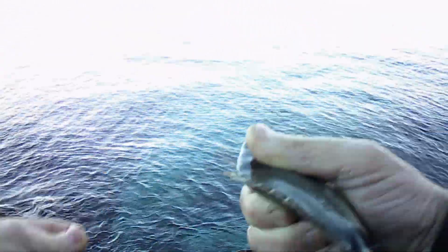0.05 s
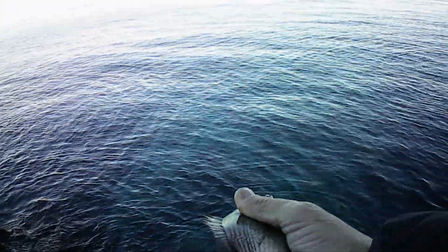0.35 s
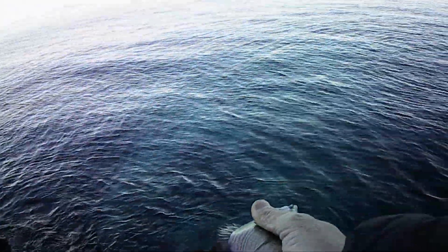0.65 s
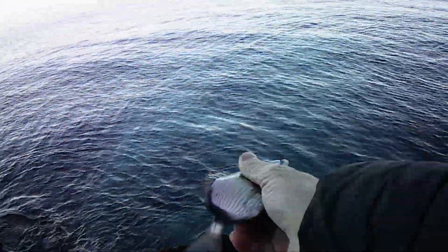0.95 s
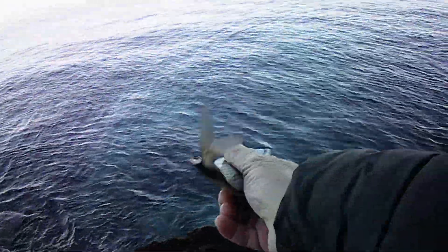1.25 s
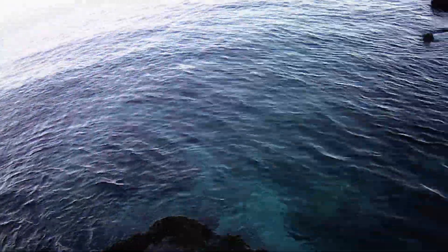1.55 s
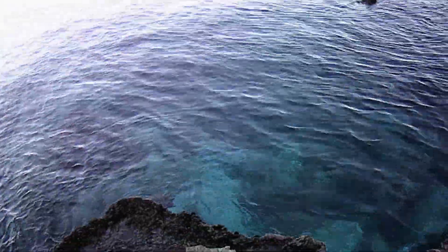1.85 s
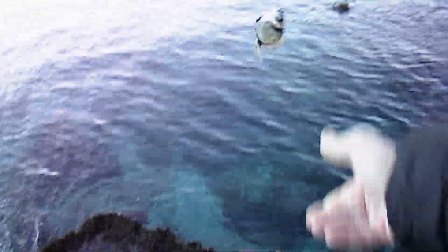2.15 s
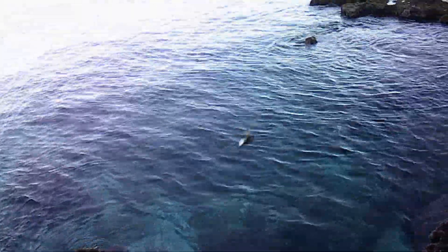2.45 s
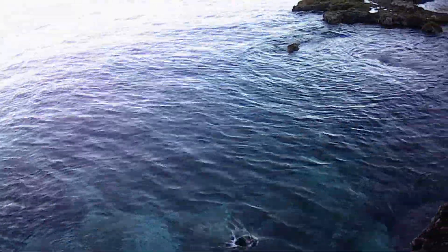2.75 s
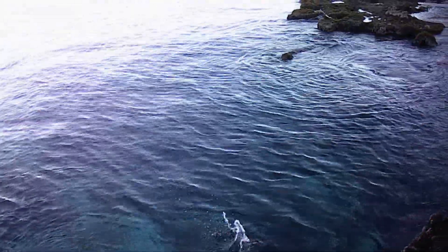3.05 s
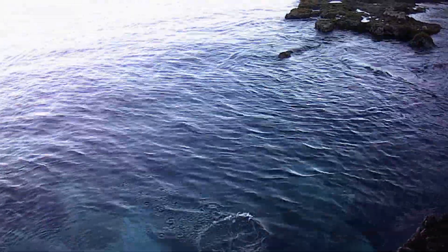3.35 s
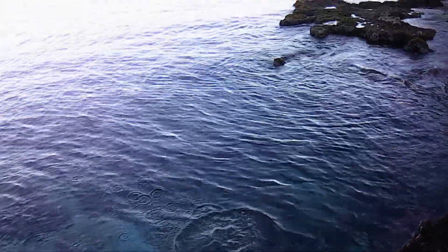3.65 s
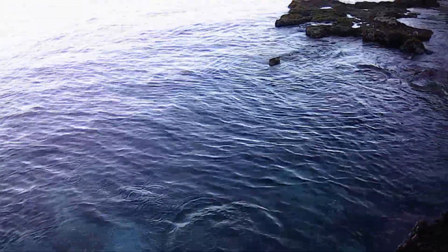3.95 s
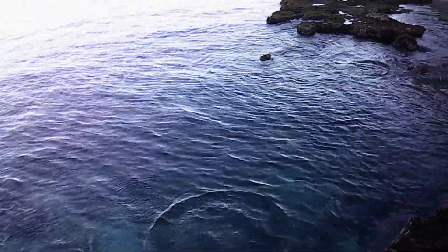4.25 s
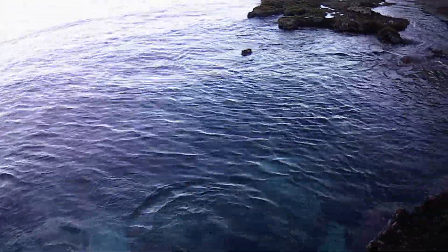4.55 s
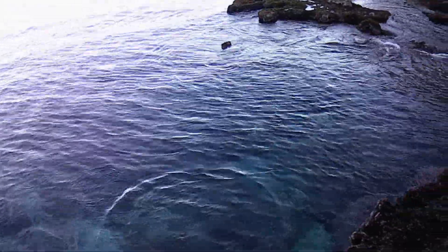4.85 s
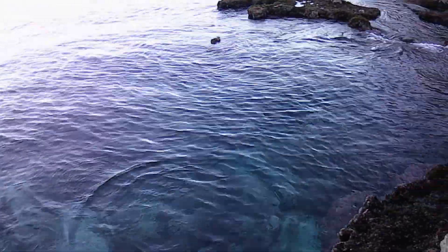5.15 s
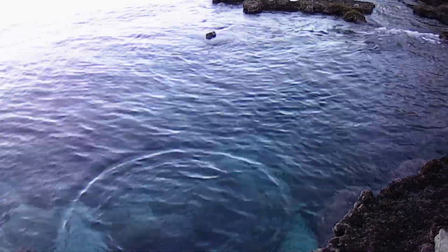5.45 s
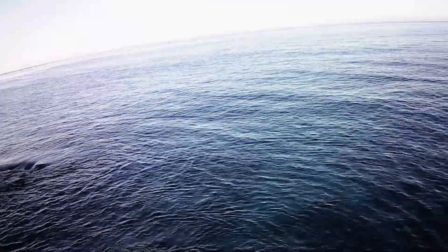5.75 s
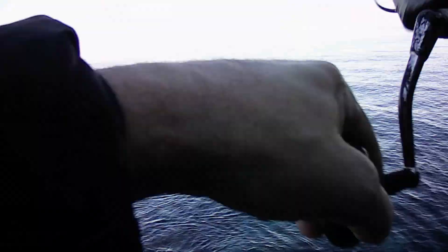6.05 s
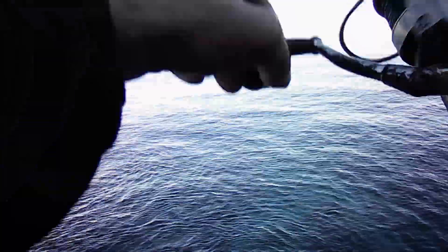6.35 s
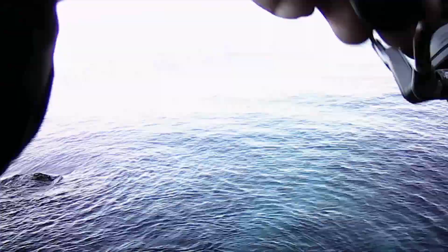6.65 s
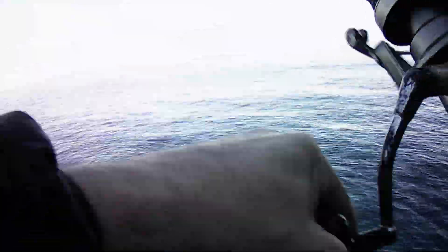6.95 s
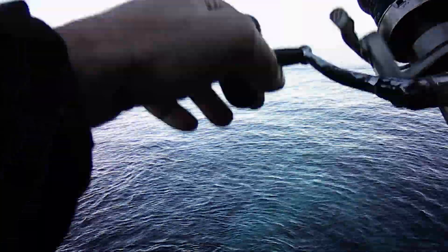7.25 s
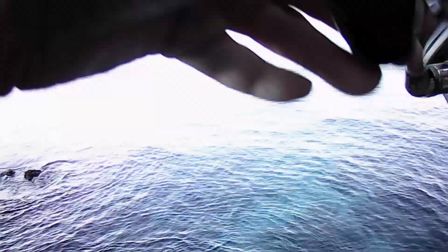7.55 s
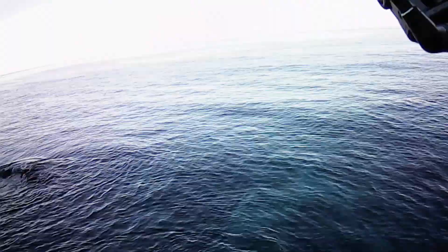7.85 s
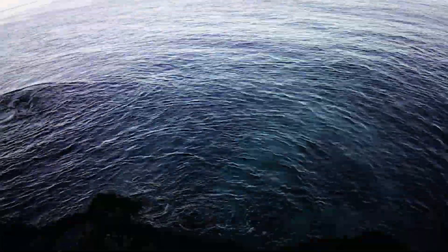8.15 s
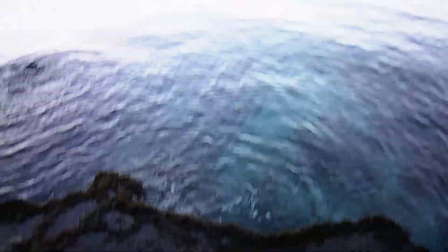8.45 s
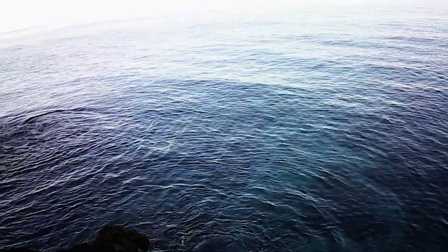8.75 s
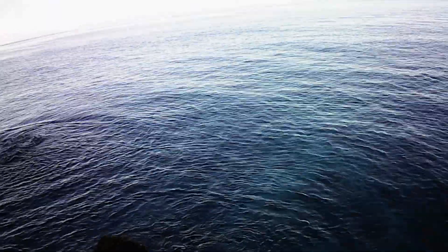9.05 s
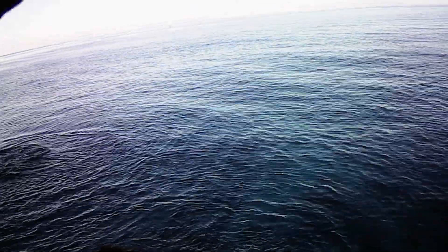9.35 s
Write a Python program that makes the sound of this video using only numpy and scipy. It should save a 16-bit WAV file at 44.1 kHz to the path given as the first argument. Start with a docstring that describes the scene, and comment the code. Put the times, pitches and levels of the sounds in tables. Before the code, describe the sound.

Calm sea water laps softly against rocks, full of little bubbles, plops and gurgles. A jacket sleeve rustles faintly and a fish lands in the water with a small splash. Fishing gear clicks sharply close to the microphone, and the sound drops out for an instant. The wash returns a little fuller over a faint, distant boat engine hum. A hand then knocks loudly on the microphone housing, followed by ticks and sleeve rustle.

```python
"""A rocky shore by a calm sea. Water laps in a soft wash full of ringing air bubbles, with single plops,
gurgles and the small splash of a fish thrown back. Gear clicks and thumps close by and the sound drops
out for a moment; then a far boat engine hums under the wash. A hand knocks and squeaks on the
microphone's housing, a loose fitting ticks, and a jacket sleeve rustles as cloth slips over cloth."""
import sys
import numpy as np
from scipy import signal
from scipy.fft import rfft, irfft
from scipy.io import wavfile

SR = 44100
rng = np.random.default_rng(int(sys.argv[2]) if len(sys.argv) > 2 else 0)


def store_pcm(level_fs):
    """Save levels as 16-bit WAV."""
    pcm = np.round(np.clip(level_fs, -1, 1) * 32767).astype(np.int16)
    wavfile.write(sys.argv[1], SR, np.atleast_2d(pcm).T)


N = 418950
TIME = np.arange(N) / SR


def from_db(db):
    """Decibels to gain."""
    return 10 ** (np.asarray(db) / 20)


def rms_one(x):
    """Scale to rms 1."""
    return x / np.sqrt(np.mean(x ** 2) + 1e-20)


def automation(points):
    """Straight ramps between (time, value) breakpoints."""
    return np.interp(TIME, *np.transpose(points))


def add(out, s, sound):
    """Mix a sound in at s seconds."""
    i = int(s * SR)
    out[i:i + len(sound)] += sound[:max(N - i, 0)]


def drift(rate_hz):
    """A smooth random modulator, rms about 1."""
    pole = np.exp(-80 * np.pi * rate_hz / SR)
    steps = rng.standard_normal(N // 40 + 2002)   # one every 40 samples
    slow = signal.lfilter([1], [1, -2 * pole, pole * pole], steps)[2000:]
    return np.interp(np.arange(N) / 40, np.arange(len(slow)), rms_one(slow))


def colour(x, eq):
    """Apply an EQ curve that rolls off 30 dB an octave past its ends; rms 1."""
    hz, db = np.transpose(eq)
    octave = np.log2(np.maximum(np.arange(N // 2 + 1) * SR / N, 1))
    outside = np.abs(octave - np.clip(octave, np.log2(hz[0]), np.log2(hz[-1])))
    gain = from_db(np.interp(octave, np.log2(hz), db) - 30 * outside)
    return rms_one(irfft(rfft(x) * gain, N))


def patchy_noise(patchy_db, rate_hz):
    """Flat noise whose half-octave bands swell and sink on their own."""
    edges = np.geomspace(60, 15000, 17)
    out, white = 0, rng.standard_normal((2, N))
    for k, band_hz in enumerate(zip(edges, edges[1:])):
        band = signal.sosfilt(signal.butter(2, band_hz, "band", fs=SR, output="sos"), white[k % 2])
        out = out + band * from_db(patchy_db * drift(rate_hz))
    return rms_one(out)


def grains(per_s, spread_db):
    """A crackle of tiny impacts of random strength; rms 1."""
    sizes = from_db(spread_db * np.minimum(rng.exponential(1, N), 5)) * rng.choice([-1, 1], N)
    return rms_one(sizes * (rng.random(N) < per_s / SR))


def surges(rows):
    """One envelope per level column: each surge builds smoothly to its crest and dies away."""
    power = 0
    for s, attack_s, release_s, *db in rows:
        age = np.maximum(TIME - s, 0) / release_s
        fade = (np.minimum(TIME - s, 0) / attack_s) ** 2 + age ** 2 / (.5 + age)
        power = power + from_db(db)[:, None] ** 2 * np.exp(-np.minimum(fade, 40))
    return np.sqrt(power)


def waves(rows):
    """Wave envelopes: water builds faster than it drains."""
    return surges([(s, 0.67 * drain_s, drain_s, *db) for s, drain_s, *db in rows])


def bubble(hz, t60, rise_oct_per_s, onset_cycles):
    """A pocket of air rings and climbs in pitch as it nears the surface; envelope peak 1."""
    t = np.arange(int(t60 * SR) + 2) / SR
    envelope = (1 - np.exp(-t * hz / onset_cycles)) * from_db(-60 * t / t60)
    phase = 2 * np.pi * np.cumsum(hz * 2 ** (rise_oct_per_s * t)) / SR
    return envelope / envelope.max() * np.sin(phase)


def bubbling(low_hz, high_hz, spread_db, cycles, max_oct_per_s, count):
    """A bed of small bubbles, with about equal energy per Hz; rms 1."""
    out = np.zeros(N)
    for when, pitch, strength, life, climb in rng.random((count, 5)):
        hz = low_hz * (high_hz / low_hz) ** pitch
        gain = from_db(-spread_db * np.log(strength + .02)) * hz
        ring = bubble(hz, cycles * (.5 + life) / hz, max_oct_per_s * climb, onset_cycles=0.57)
        add(out, when * N / SR, gain * ring)
    return rms_one(out)


# EQ of the mid slosh, the bright spray and the low swash: (f/Hz, level/dB)
SLOSH_EQ = [(90, -20), (130, -13), (180, -6), (300, -0.5), (450, -1.5), (700, -3), (900, -3), (1100, -4.5),
            (1350, -6.5), (1600, -6.5), (1850, -14), (2100, -24), (2400, -41.5)]
SPRAY_EQ = [(1700, 5.5), (2100, 0.5), (2450, 1), (2850, 1), (3250, -4.5), (3750, -1), (4300, -9.5),
            (4950, -6), (6000, -11.5), (7000, -16.5), (8500, -24), (10500, -22), (12500, -27)]
SWASH_EQ = [(20, -14), (45, -9), (80, -1.5), (140, 0.5), (220, -3)]
# vigour of the wash, one list before the dropout and one after: (t/s, level/dB)
WASH_RIDE = [
    [(0.0, -56), (1.29, -61.5), (1.78, -56), (2.14, -55.5), (2.62, -57.5), (3.07, -54), (3.51, -56.5),
     (4.25, -54.5), (5.15, -49)],
    [(5.8, -49.5), (6.14, -54), (6.58, -50.5), (7.34, -48.5), (7.67, -48.5), (8.0, -47.5), (8.87, -51.5),
     (9.15, -51), (9.5, -52.5)],
]
# low shelf on the slosh, its weight: (t/s, level/dB)
BODY_RIDE = [(0, 1.5), (1.0, 0), (2.3, -1), (2.65, -4), (3.05, 0.5), (3.5, -1), (4.35, -5), (4.75, -5.5),
             (5.15, -2), (5.8, -0.5), (6.9, 1), (7.35, -1.5), (7.7, 0.5), (9.5, .5)]
# bubbles in the wash, strongest while facing the rocks: (t/s, relative level/dB)
BUBBLE_RIDE = [(0, -12), (3, -8.5), (5.2, -11), (5.7, -15)]
# wavelets breaking on the rocks: (crest t/s, drain/s, slosh level/dB, spray level/dB)
WAVELETS = [(0.02, 0.032, -63, -92.5), (0.8, 0.075, -61.5, -75), (1.5, 0.098, -61.5, -68),
            (1.71, 0.038, -57.5, -67), (1.93, 0.13, -58.5, -71), (2.27, 0.12, -53.5, -75),
            (3.14, 0.054, -57.5, -73), (4.36, 0.064, -58, -71), (4.78, 0.038, -61, -84),
            (6.05, 0.27, -47.5, -66), (7.09, 0.11, -48.5, -66), (7.25, 0.031, -44.5, -66),
            (7.42, 0.093, -45, -69), (9.25, 0.37, -71, -68.5)]
# swells heaving in the hollows: (crest t/s, drain/s, level/dB)
HEAVES = [(3.08, 0.13, -65), (3.5, 0.3, -65.5), (4.3, 0.18, -75), (4.52, 0.099, -68.5), (5.17, 0.027, -68),
          (5.68, 0.11, -72), (7.44, 0.042, -63), (7.95, 0.13, -63), (8.52, 0.11, -63)]
SPRAY_DB, SWASH_DB, BODY_HZ = -68, -75, 560


def sea():
    """Water sloshes among the rocks; spray follows its vigour, wavelets lift both, swells heave below."""
    wash_db = automation([point for part in WASH_RIDE for point in part])
    wave_slosh, wave_spray = waves(WAVELETS)
    slosh_gain = np.hypot(from_db(wash_db), wave_slosh)
    spray_gain = np.hypot(from_db(SPRAY_DB + 0.79 * (wash_db - wash_db.mean())), wave_spray)
    swash_gain = np.hypot(from_db(SWASH_DB), waves(HEAVES)[0])
    bubble_gain = from_db(automation(BUBBLE_RIDE))
    churn = patchy_noise(patchy_db=1.37, rate_hz=14)
    bubbles = bubbling(201.5, 1973, spread_db=2.0, cycles=30.3, max_oct_per_s=10.4, count=3600)
    fizz = bubbling(1900, 4500, spread_db=2.5, cycles=51, max_oct_per_s=9, count=2000)
    drops = rng.standard_normal(N) + from_db(-5.5) * grains(per_s=1100, spread_db=4.0)
    spray = colour(drops + from_db(-1) * bubble_gain * fizz, SPRAY_EQ)
    slosh = colour(churn + bubble_gain * bubbles, SLOSH_EQ)
    lows = signal.sosfiltfilt(signal.butter(2, BODY_HZ, fs=SR, output="sos"), slosh)
    slosh += (from_db(automation(BODY_RIDE)) - 1) * lows
    ripple = from_db(1.43 * drift(7.9))   # each ripple lifts slosh and spray together
    swash = colour(rng.standard_normal(N), SWASH_EQ)
    return ripple * (slosh_gain * slosh + spray_gain * spray) + swash_gain * swash


# EQ of the noise floor: (f/Hz, level/dB)
HISS_EQ = [(2000, -9), (7000, 3), (8500, -1.5), (10200, 0), (12500, -11.5)]


def hiss():
    """The microphone's own faint, steady hiss."""
    return from_db(-82) * colour(rng.standard_normal(N), HISS_EQ)


# large single bubbles: (t/s, peak level/dB, f/Hz, t60/s)
PLOPS = [(0.028, -46.5, 434, 0.075), (0.06, -46, 486, 0.06), (0.16, -47.5, 713, 0.08),
         (0.239, -48, 1130, 0.035), (0.434, -48.5, 505, 0.041), (0.597, -45, 840, 0.023),
         (0.598, -46, 537, 0.027), (1.572, -38, 342, 0.068), (1.614, -44, 311, 0.11),
         (2.09, -43, 527, 0.12), (2.11, -43, 700, 0.04), (2.799, -39.5, 374, 0.042),
         (2.855, -39, 1076, 0.076), (2.867, -32.5, 1117, 0.035), (2.871, -35, 590, 0.024),
         (2.881, -31.5, 478, 0.032), (2.965, -42, 1555, 0.062), (3.066, -55, 2600, 0.054),
         (3.085, -47, 287, 0.042), (3.109, -39, 434, .036), (3.131, -40.5, 660, .04),
         (3.339, -43, 690, 0.026), (3.606, -42.5, 804, 0.04), (3.663, -36, 335, 0.038),
         (4.518, -31, 950, 0.025), (4.799, -41.5, 1110, 0.042), (4.978, -38.5, 342, 0.12),
         (5.167, -39, 765, 0.037), (5.174, -35.5, 434, 0.031), (7.287, -35, 860, 0.055),
         (7.311, -42, 470, 0.08), (9.118, -38.5, 357, 0.051)]
BEND_OCT = 0.22   # upward bend over one ring


def plops():
    """Trapped air rings as a round, rising note."""
    out = np.zeros(N)
    for s, db, hz, t60 in PLOPS:
        add(out, s, from_db(db) * bubble(hz, t60, BEND_OCT / t60, onset_cycles=0.46))
    return out


# gurgles where a lap folds in air: (t/s, length/s, peak level/dB, lowest f/Hz, highest f/Hz)
GURGLES = [(0.118, 0.049, -50.5, 600, 1550), (0.692, 0.036, -49.5, 397, 806),
           (0.793, 0.025, -48.5, 297, 1160), (1.71, 0.04, -48, 443, 1500), (1.852, 0.035, -45, 534, 1160),
           (1.955, 0.03, -47, 303, 1400), (2.235, 0.044, -46, 325, 1650), (2.295, 0.026, -44, 396, 1650),
           (2.505, 0.013, -42.5, 560, 1350), (2.669, 0.0064, -46, 600, 1400),
           (2.866, 0.013, -40, 1100, 1740), (3.0, 0.021, -44, 910, 1730), (3.23, 0.045, -42.5, 950, 1590),
           (3.342, 0.022, -46, 554, 1100), (3.387, 0.008, -45, 500, 1200), (3.76, 0.02, -45.5, 850, 1550),
           (4.238, 0.0093, -44, 860, 1400), (4.33, 0.049, -42, 714, 1790), (4.712, 0.02, -40, 375, 990),
           (4.76, 0.027, -40.5, 375, 804), (4.85, 0.052, -42.5, 425, 840), (5.095, 0.015, -42, 420, 736),
           (5.99, 0.075, -43.5, 260, 507), (7.07, 0.025, -47.5, 275, 479), (7.335, 0.073, -39.5, 300, 560),
           (7.497, 0.05, -40, 232, 526)]
# fine high crackles: sprinkles of droplets, and the sleeve's crackle at 1.6-1.8 s; same columns
CRACKLES = [(0.315, 0.006, -58, 4200, 5400), (0.647, 0.011, -51.5, 1730, 2280),
            (1.635, 0.046, -54.5, 2180, 5500), (1.745, 0.025, -69, 3200, 6500),
            (1.975, 0.04, -53, 2000, 3480), (2.235, 0.043, -53, 2000, 3300), (3.39, 0.022, -60, 3500, 6500),
            (3.51, 0.028, -59, 4170, 6400), (3.6, 0.05, -64, 3200, 6000), (3.745, 0.016, -57, 1900, 2780),
            (7.09, 0.05, -52, 2190, 3130), (7.22, 0.052, -51.5, 2000, 3550)]


def ping_runs(rows, cycles, per_s, base_count):
    """Quick runs of bubble-like pings in shuffled pitch: low ones gurgle, high ones crackle."""
    out = np.zeros(N)
    for (s, length, db, low_hz, high_hz), chance in zip(rows, rng.random((len(rows), 3, 64))):
        order, late, accent = chance[:, :base_count + int(length * per_s)]
        pitches = np.geomspace(low_hz, high_hz, len(order))[np.argsort(order)]
        run = np.zeros(SR)
        for k, hz in enumerate(pitches):
            ring = bubble(hz, cycles / hz, BEND_OCT * hz / cycles, onset_cycles=0.52)
            add(run, length * (k + late[k]) / len(pitches), (1 + accent[k]) * ring)
        add(out, s, from_db(db) * run / np.abs(run).max())
    return out


# slaps and spatters of water: (t/s, level/dB, t60/s)
SLAPS = [(0.596, -48, 0.028), (2.203, -47, 0.056), (2.591, -52, 0.027), (2.670, -54, .03),
         (2.74, -39.5, .042), (2.749, -46, 0.039), (2.866, -43, 0.042), (2.878, -45.5, 0.092),
         (3.183, -47, 0.038), (3.388, -50, .028), (3.606, -49, 0.036)]
# their EQ: (f/Hz, level/dB)
SLAP_EQ = [(500, -1.5), (1500, 10.5), (2100, -4.5), (2800, -11.0), (3800, -3.5), (5000, -9.5),
           (7000, -15.0), (11000, -27)]


def slaps(attack_s=0.0044):
    """A slap throws a short burst of spray that takes an instant to spread."""
    drops = rng.standard_normal(N) + from_db(-2.0) * grains(per_s=2500, spread_db=-4.0)
    out, spray = np.zeros(N), colour(drops, SLAP_EQ)
    for s, db, t60 in SLAPS:
        t = np.arange(int(t60 * SR)) / SR
        envelope = np.minimum(t / attack_s, 1) * from_db(db - 60 * t / t60)
        add(out, s, envelope * spray[int(s * SR):][:len(t)])
    return out


def strikes(hits, modes, polarity, detune, snap, crack_db, crack_t60, tail_db, tail_t60, order=2):
    """Each contact snaps and rings the modes, with a gritty crack and a short noise tail."""
    out, t = np.zeros(N), np.arange(SR // 5) / SR
    hz, db, t60 = np.transpose(modes)[:, :, None]
    signs = polarity ** np.arange(len(hz))[:, None]   # 1: hard edge; -1: hollow build-up
    crack_top = signal.butter(3, 7000, fs=SR, output="sos")
    for s, peak_db, low_hz, high_hz in hits:
        strength = signs * from_db(db + rng.standard_normal(hz.shape))
        pitch = hz * (1 + detune * (2 * rng.random(hz.shape) - 1))   # the grip shifts the modes
        ring = np.sum(strength * from_db(-60 * t / t60) * np.sin(2 * np.pi * pitch * t), axis=0)
        decay = from_db(crack_db - 60 * t / crack_t60) + from_db(tail_db - 60 * t / tail_t60)
        grit = decay * rng.standard_normal(len(t))
        crack = signal.sosfilt(crack_top, grit + polarity * snap * (t == 0))
        # light contacts are thinner, soft ones duller
        low_cut = signal.butter(2, low_hz, "high", fs=SR, output="sos")
        high_cut = signal.butter(order, high_hz, fs=SR, output="sos")
        hit = signal.sosfilt(np.vstack([low_cut, high_cut]), ring + crack)
        add(out, s, from_db(peak_db) * hit / np.abs(hit).max())
    return out


# ticks of a loose fitting: (t/s, peak level/dB, low cut f/Hz, high cut f/Hz)
TICKS = [(1.0770, -46.5, 1100, 2400), (7.8566, -20.5, 2000, 5000), (7.8608, -23.5, 4200, 7500),
         (7.8630, -34, 4800, 7000), (8.1440, -33.5, 600, 4000), (8.1735, -32, 401, 2510)]
# its modes: (f/Hz, level/dB, t60/s)
FITTING_MODES = [(600, -1, 0.028), (1176, -0.5, 0.033), (2620, -7, 0.02), (3710, -1.5, 0.018),
                 (4800, -1, 0.016), (5210, -5, 0.021), (6200, -11, 0.013), (9100, -18, 0.011),
                 (11000, -13, 0.008)]


def fitting_ticks():
    """A small loose part taps and rings brightly."""
    return strikes(TICKS, FITTING_MODES, polarity=-1, detune=0.006, snap=0.6,
                   crack_db=-5, crack_t60=0.011, tail_db=-27, tail_t60=0.05)


# sleeve strokes: (fastest t/s, attack/s, release/s, rub level/dB, swish level/dB)
STROKES = [(1.63, 0.028, 0.05, -60.5, -80), (1.98, 0.062, 0.015, -62, -70),
           (2.23, 0.072, 0.078, -63, -73.5), (4.97, 0.008, 0.026, -85, -68.5),
           (5.19, 0.0055, 0.0074, -43, -54.5), (7.875, 0.019, 0.042, -43, -64),
           (7.915, 0.0066, 0.053, -46.5, -54.5), (7.98, 0.02, 0.027, -53, -59),
           (8.025, 0.026, 0.012, -39.5, -66), (8.065, 0.018, 0.081, -51, -80),
           (8.548, 0.043, 0.01, -41, -61)]
# EQ of the dull rub and the bright swish: (f/Hz, level/dB)
RUB_EQ = [(150, 0.5), (400, 5.5), (1100, 5.5), (1600, 7), (2300, -6.5), (2900, -5.5), (3300, -15.5),
          (3750, -3.5), (4300, -23.5), (6500, -24.5), (8500, -38.5), (12000, -40.5)]
SWISH_EQ = [(2500, 1), (4500, 6.5), (7000, 1), (8500, -6), (12000, -15)]


def sleeve():
    """Cloth rubs in countless small slips, with a bright swish on top."""
    slips = rng.standard_normal(N) + from_db(4.5) * grains(per_s=2500, spread_db=1.5)
    grip = from_db(drift(45))
    rub, swish = surges(STROKES)
    return grip * (rub * colour(slips, RUB_EQ) + swish * colour(slips, SWISH_EQ))


# hard clicks and dull thumps of gear: (t/s, peak level/dB, low cut f/Hz, high cut f/Hz)
CLICKS = [(5.1842, -16.5, 1200, 3000), (5.1858, -32, 3000, 8500), (5.2015, -40, 1500, 4530),
          (5.2166, -27, 1100, 4800), (5.2353, -33.5, 900, 2800), (5.3248, -30.5, 2600, 6100),
          (5.3974, -12.5, 850, 6600), (5.3988, -27, 350, 1700), (6.9880, -52, 7500, 12000)]
THUMPS = [(5.1835, -38, 150, 400), (5.3220, -20, 160, 1595)]
# its modes, free and damped by the hand: (f/Hz, level/dB, t60/s)
GEAR_MODES = [(590, -8.5, 0.017), (1100, -15.5, 0.009), (1520, -6, 0.013), (2210, -4.5, 0.005),
              (2990, -2, 0.0062), (4000, 1, 0.0035), (4540, -2.5, 0.0056), (6030, -4, 0.0052),
              (10860, 1.5, 0.005)]
DAMPED_MODES = [(185, -6, 0.022), (310, -5, 0.016), (773, 3, 0.0092), (1400, -5.5, 0.009)]


def gear():
    """Gear clicks on hard contact and thumps against the hand, which damps its ring."""
    clicks = strikes(CLICKS, GEAR_MODES, polarity=1, detune=0.02, snap=0.8,
                     crack_db=-2.5, crack_t60=0.0083, tail_db=-31, tail_t60=0.19, order=4)
    thumps = strikes(THUMPS, DAMPED_MODES, polarity=1, detune=0.02, snap=0.5,
                     crack_db=-7, crack_t60=0.008, tail_db=-26, tail_t60=0.05)
    return clicks + thumps


# partials of the engine hum: (multiple of the firing rate, rms level/dB)
ENGINE_PARTIALS = [(2, -75.5), (3, -69), (4, -74), (4.999, -73.5), (6.1, -64.5)]


def boat(start_s=5.55, firing_hz=48.85, waver=0.0015, flutter_db=1.5):
    """Only the low tones of a far engine carry over the water, wavering a little."""
    phase = 2 * np.pi * np.cumsum(firing_hz * (1 + waver * drift(3.3))) / SR
    hum = sum(from_db(db + flutter_db * drift(6.5)) * np.sin(k * phase) for k, db in ENGINE_PARTIALS)
    return (TIME > start_s) * np.sqrt(2) * hum


# knocks on the housing: (t/s, peak level/dB, low cut f/Hz, high cut f/Hz)
KNOCKS = [(7.8513, -21.5, 152, 800), (7.8521, -10.5, 161, 1060), (7.8567, -23, 1300, 2800),
          (7.8585, -16.5, 199, 1290), (7.8695, -29, 506, 2500), (7.8757, -33, 905, 1800),
          (7.8875, -25.5, 200, 1000), (7.9410, -30, 250, 1300)]
# its modes: (f/Hz, level/dB, t60/s)
HOUSING_MODES = [(163, -16.5, 0.23), (226, -1, 0.071), (382, 2, 0.085), (573, 1.5, 0.092), (696, 2, 0.037),
                 (928, -13.5, 0.13), (1110, -5, 0.018), (1470, -11, 0.028), (1800, -1, 0.024),
                 (2270, -10, 0.028), (2525, -1.5, 0.068), (3660, -15, 0.025)]


def housing_knocks():
    """A hand bumps the microphone's housing, which rings like a small hollow box."""
    return strikes(KNOCKS, HOUSING_MODES, polarity=-1, detune=0.0035, snap=16.0,
                   crack_db=0, crack_t60=0.053, tail_db=-1, tail_t60=0.09)


def squeak(start_s=7.886, length_s=0.018, hz=666, peak_db=-24):
    """The hand sticks and slips on the housing, building a tone that stops as it lets go."""
    out, t = np.zeros(N), np.arange(int(length_s * SR)) / SR
    swell = np.sin(np.pi * (t / length_s) ** 2)
    add(out, start_s, from_db(peak_db) * swell * np.sin(2 * np.pi * hz * t))
    return out


def scene():
    """The mono mix: water, close handling sounds and the far boat over a faint hiss."""
    water = sea() + plops() + slaps()
    gurgles = ping_runs(GURGLES, cycles=19.4, per_s=100, base_count=5)
    crackles = ping_runs(CRACKLES, cycles=22.5, per_s=160, base_count=3)
    handling = gear() + fitting_ticks() + housing_knocks() + squeak()
    return (water + gurgles + crackles + handling + hiss() + sleeve() + boat())[None]


DROPOUT_START_S, DROPOUT_END_S, DROPOUT_DB = 5.436, 5.594, -65
FADE_OUT_DB_PER_S, FADE_IN_DB_PER_S, HIGH_CUT_HZ = 1701.5, 1901, 12500


def record(dry):
    """The sound ducks to near silence for a moment; a steep high cut trims the whole mix."""
    fade_out_db = FADE_OUT_DB_PER_S * (DROPOUT_START_S - TIME)
    fade_in_db = FADE_IN_DB_PER_S * (TIME - DROPOUT_END_S)
    gain = from_db(np.clip(np.maximum(fade_out_db, fade_in_db), DROPOUT_DB, 0))
    return signal.sosfilt(signal.ellip(10, .1, 80, HIGH_CUT_HZ, fs=SR, output="sos"), dry * gain)


dry = scene()
out = record(dry)
store_pcm(out)
```